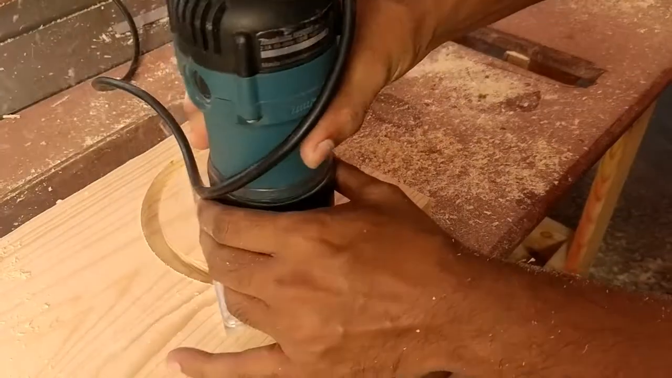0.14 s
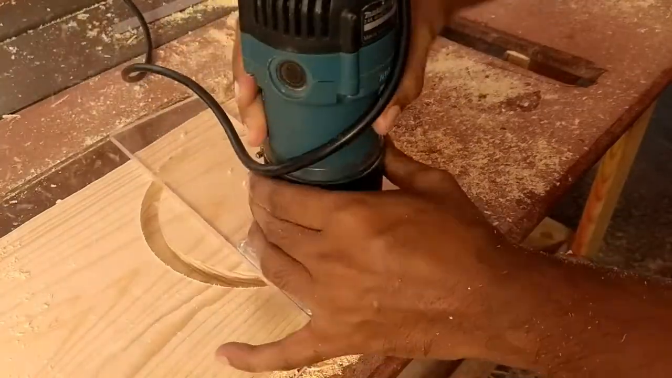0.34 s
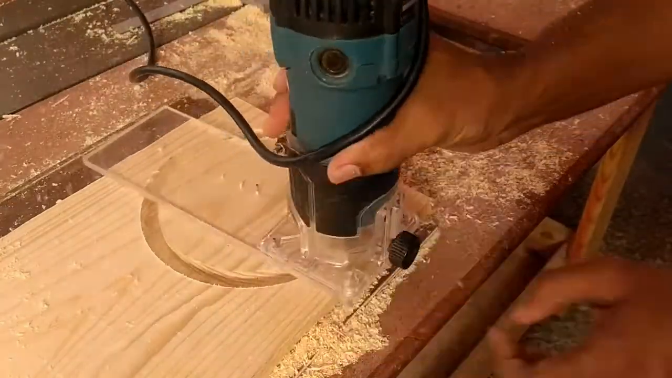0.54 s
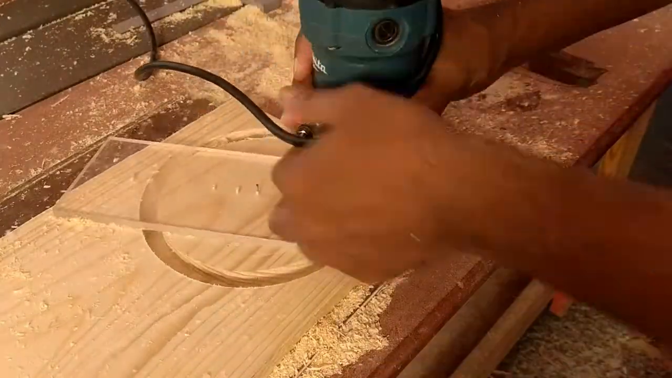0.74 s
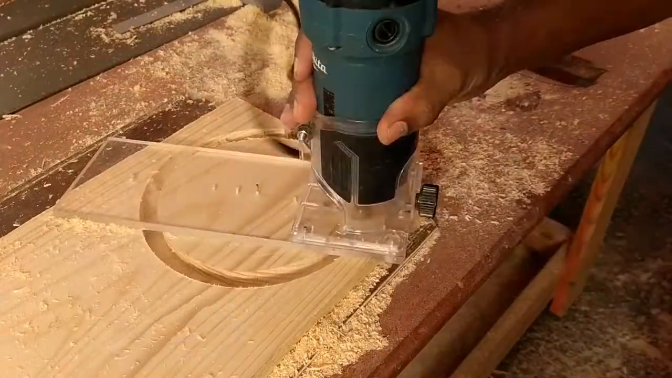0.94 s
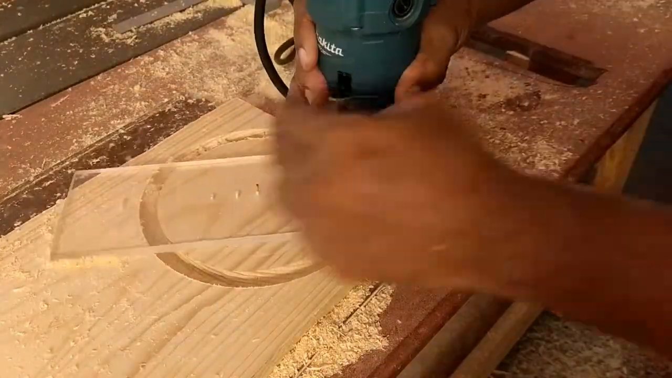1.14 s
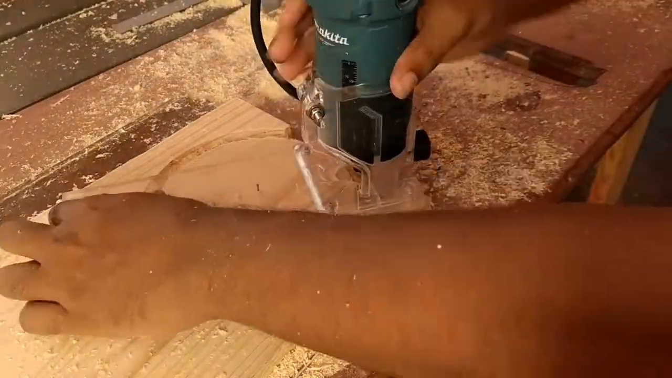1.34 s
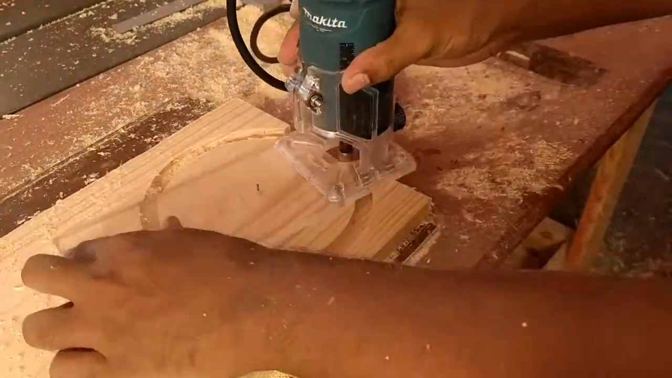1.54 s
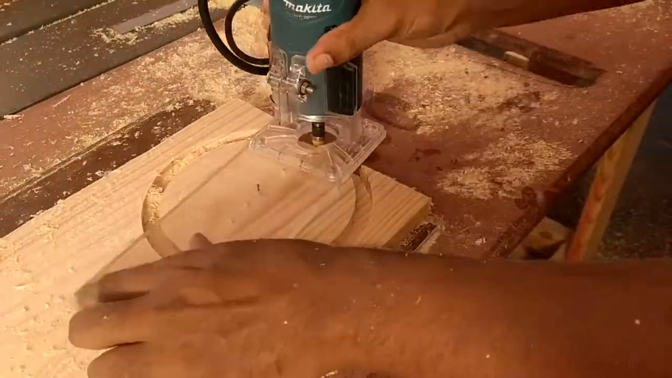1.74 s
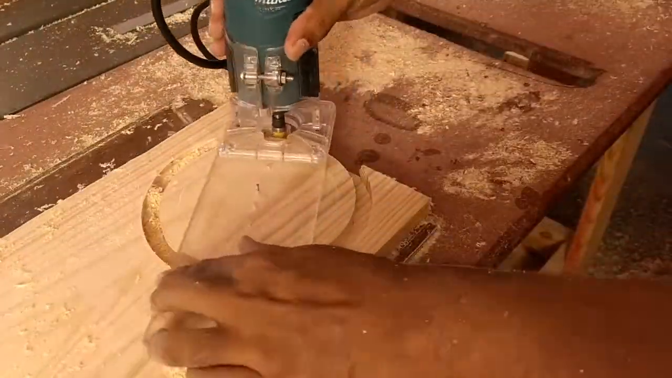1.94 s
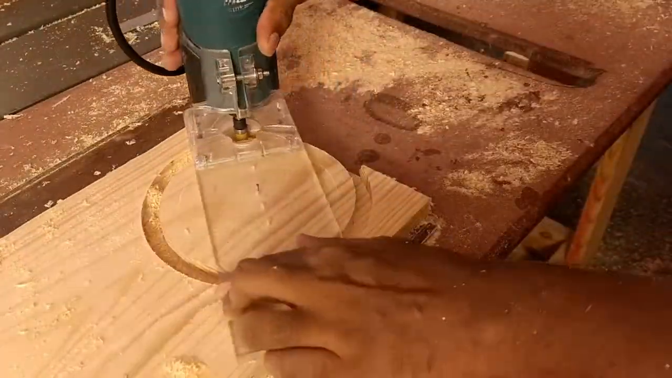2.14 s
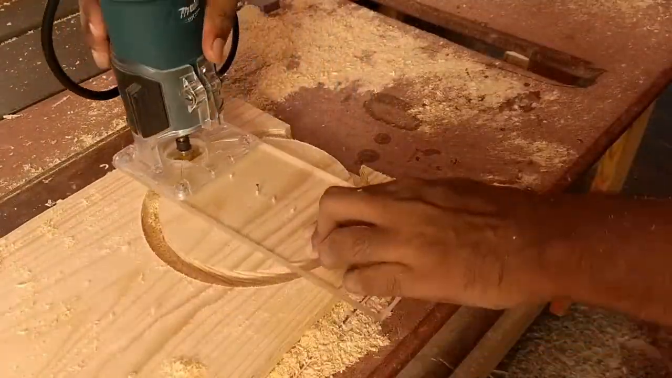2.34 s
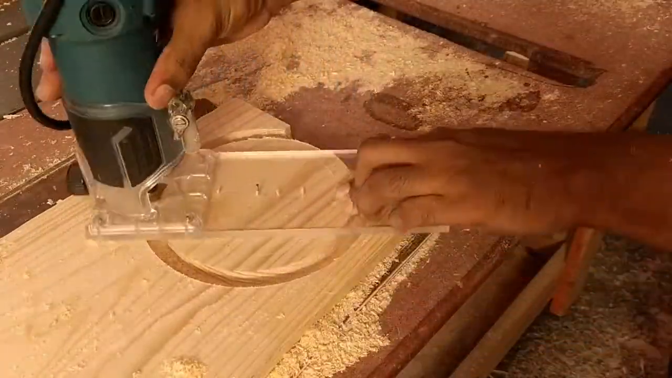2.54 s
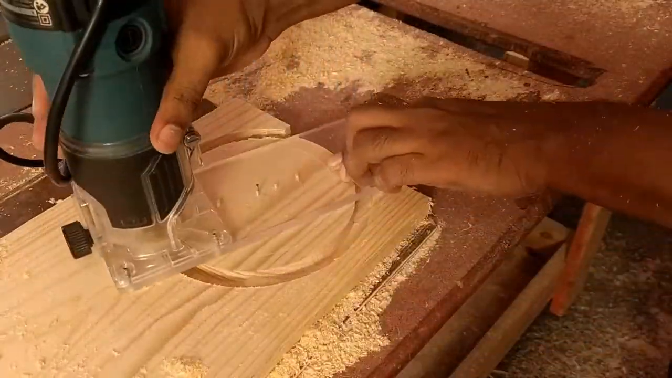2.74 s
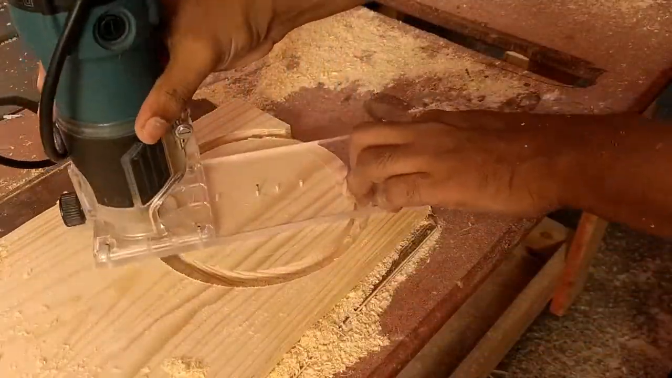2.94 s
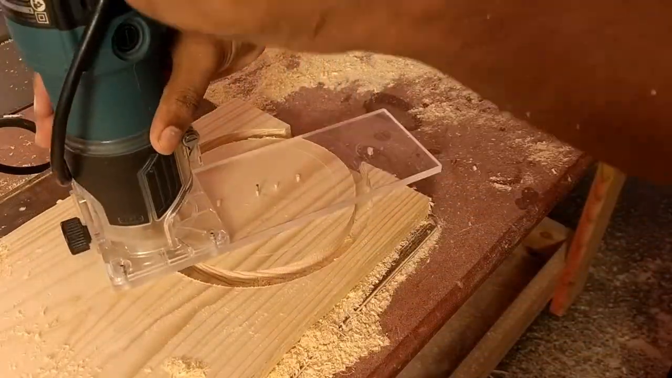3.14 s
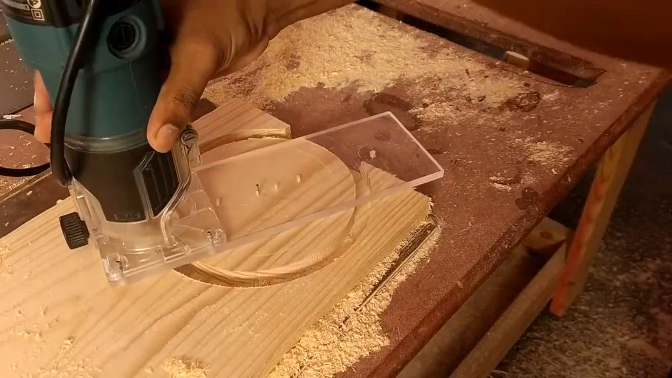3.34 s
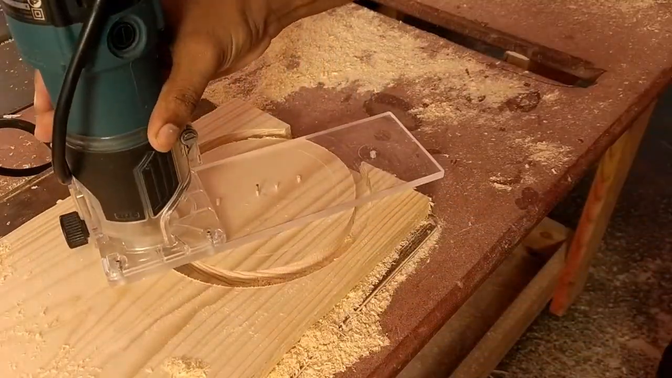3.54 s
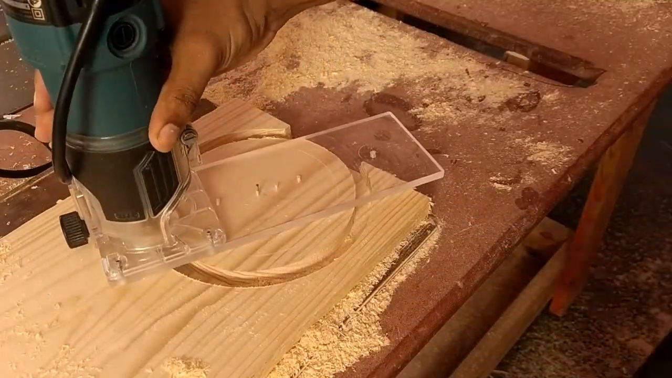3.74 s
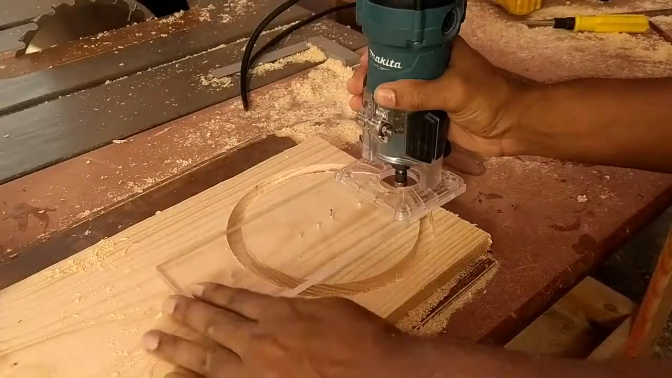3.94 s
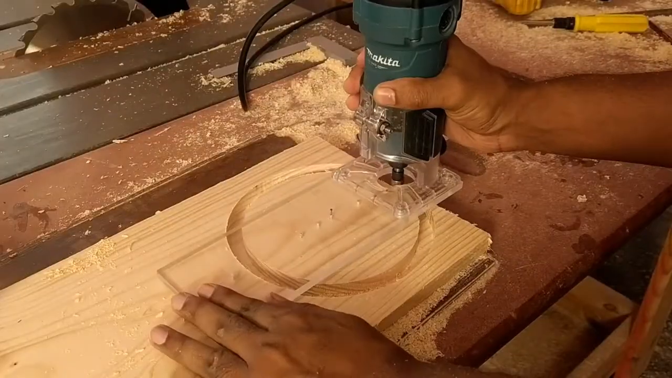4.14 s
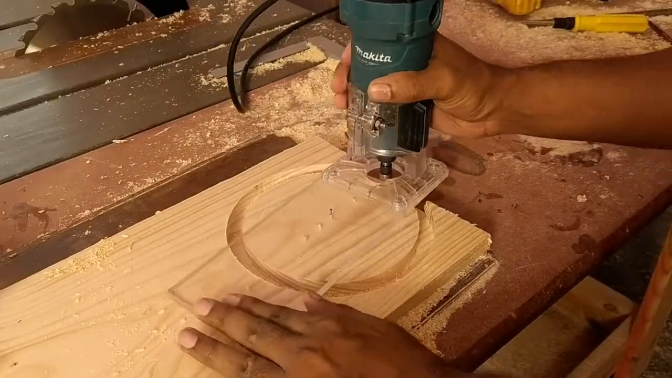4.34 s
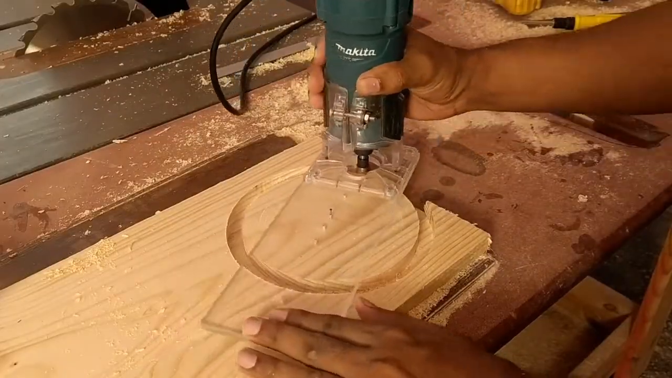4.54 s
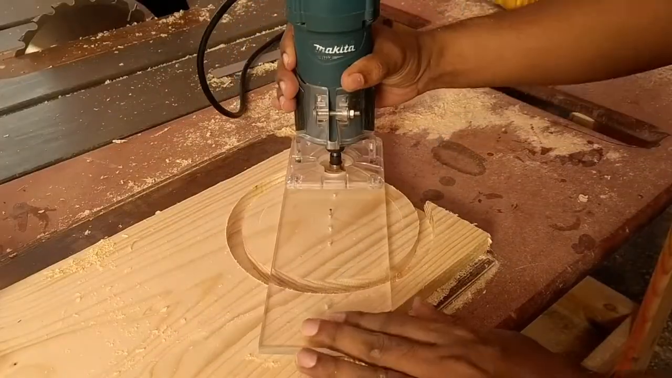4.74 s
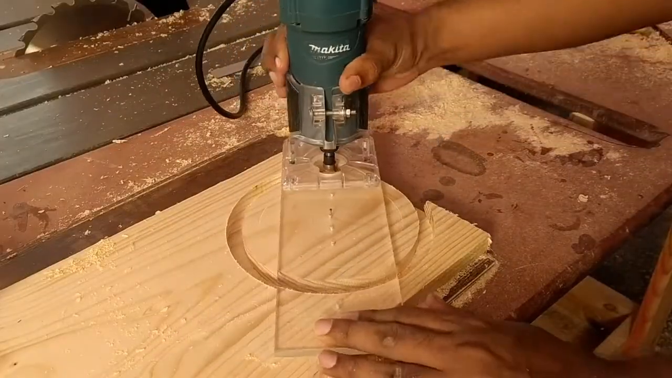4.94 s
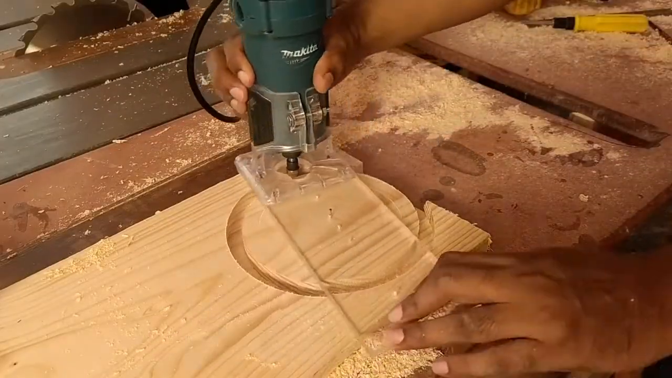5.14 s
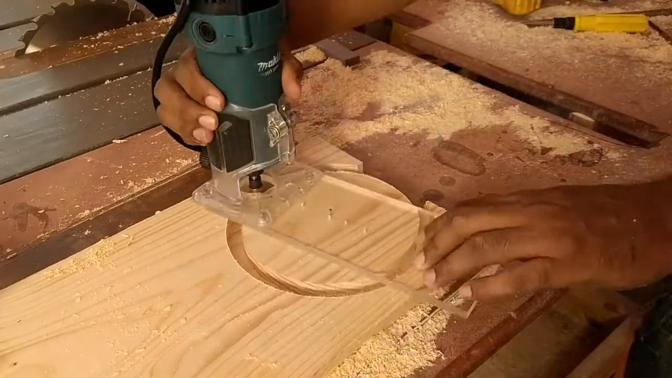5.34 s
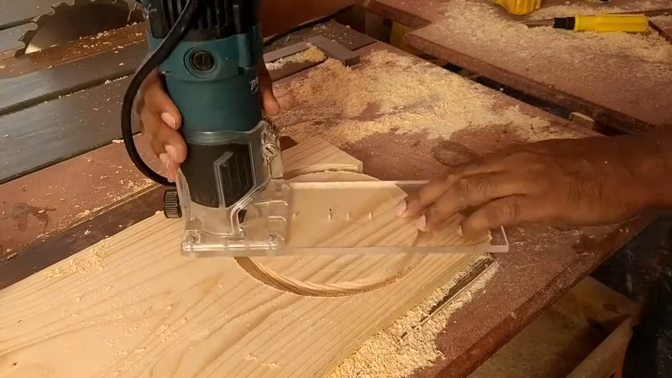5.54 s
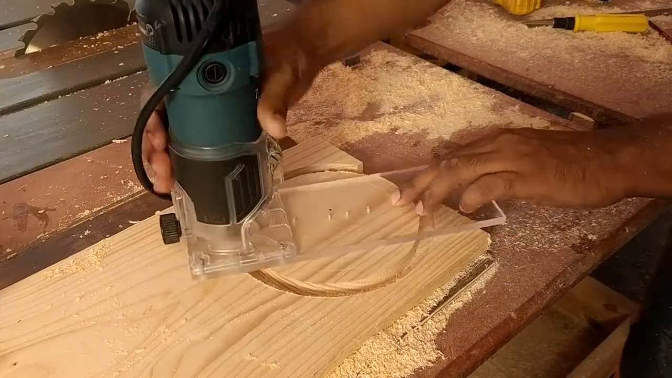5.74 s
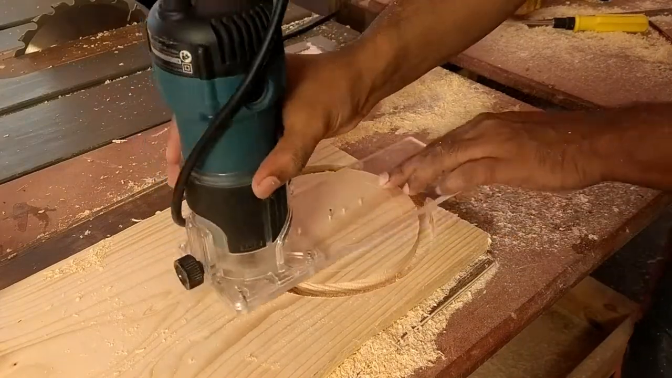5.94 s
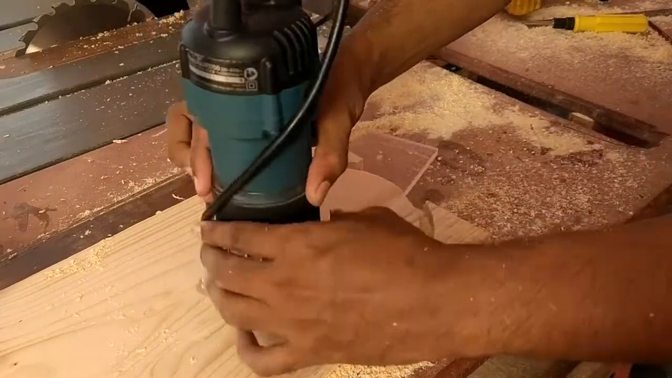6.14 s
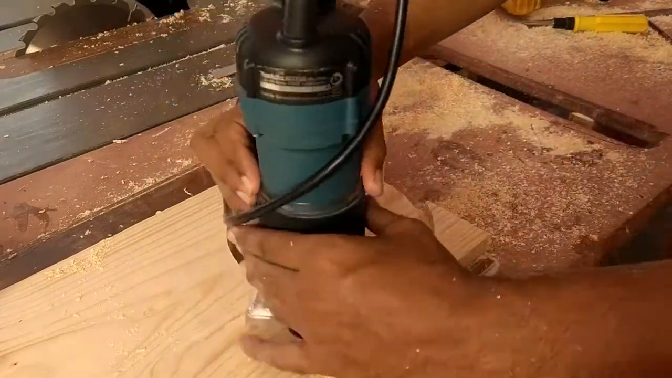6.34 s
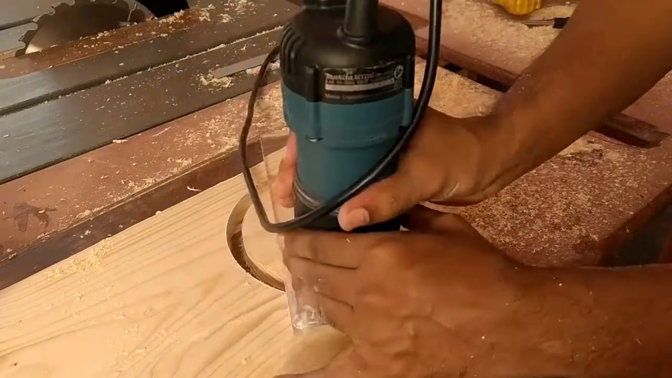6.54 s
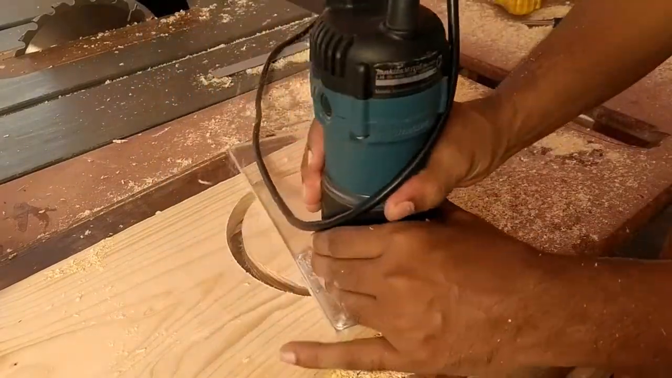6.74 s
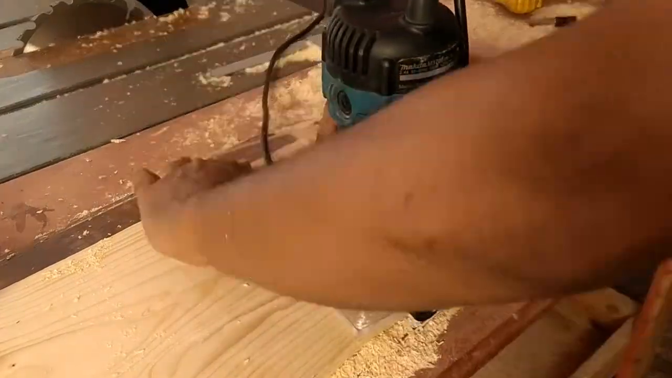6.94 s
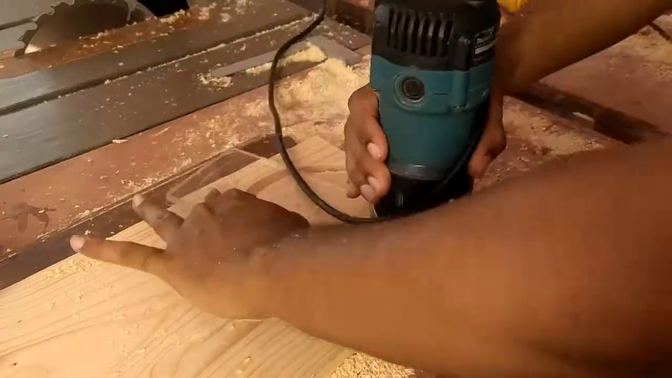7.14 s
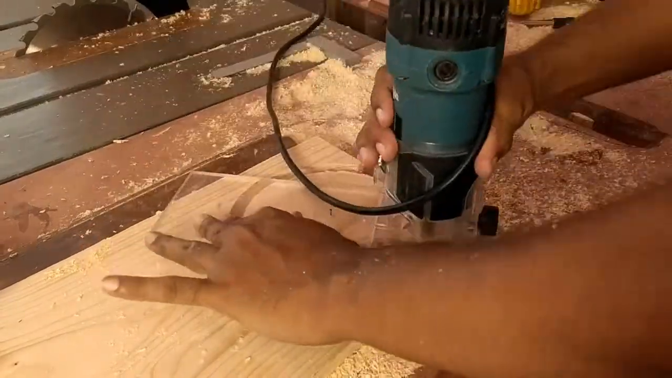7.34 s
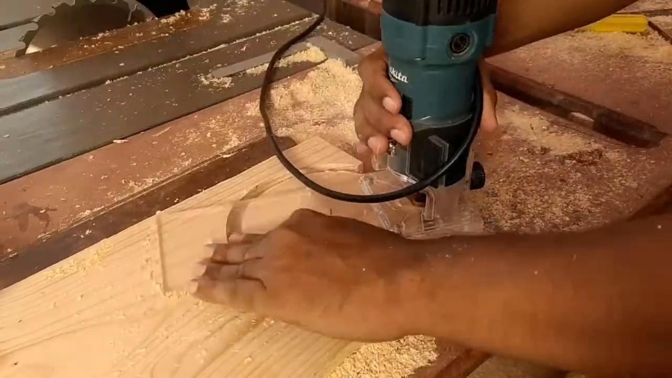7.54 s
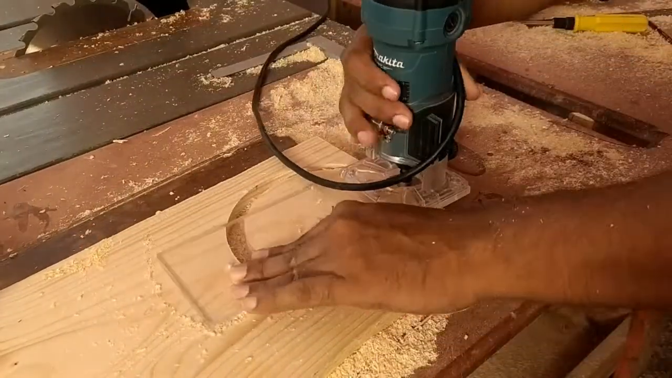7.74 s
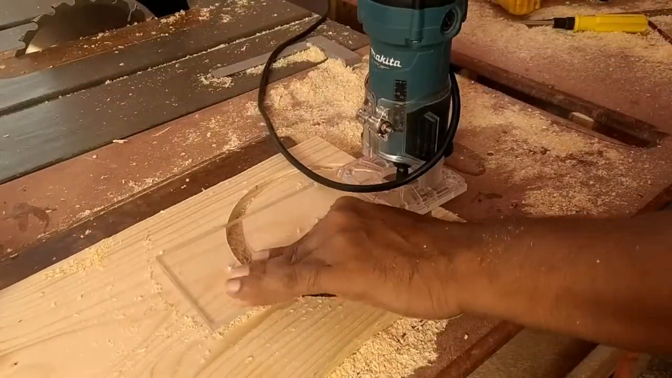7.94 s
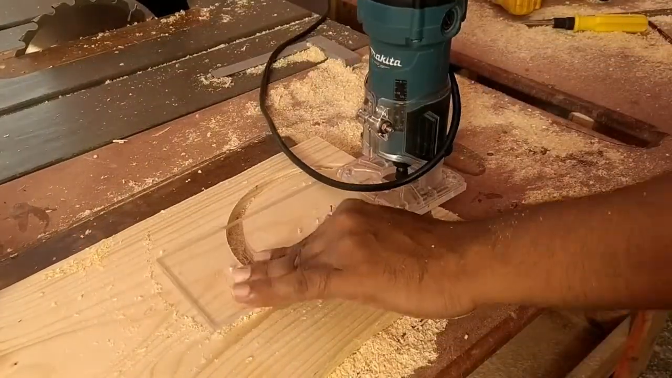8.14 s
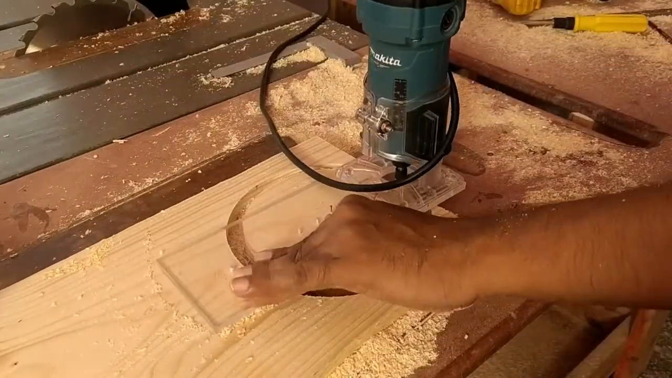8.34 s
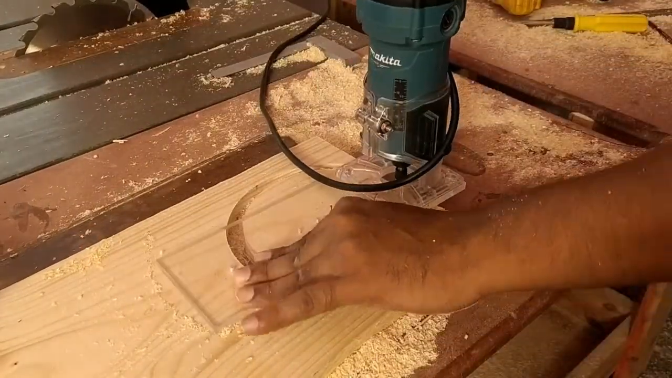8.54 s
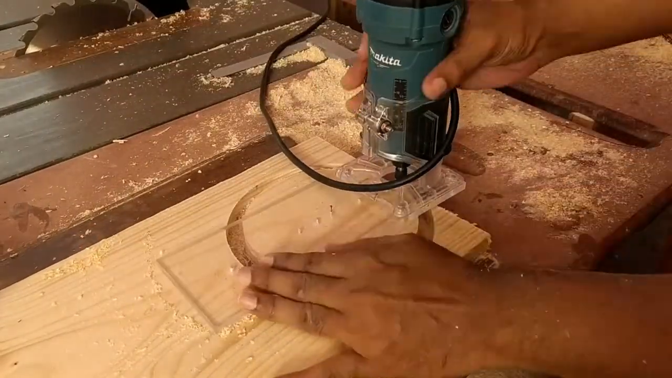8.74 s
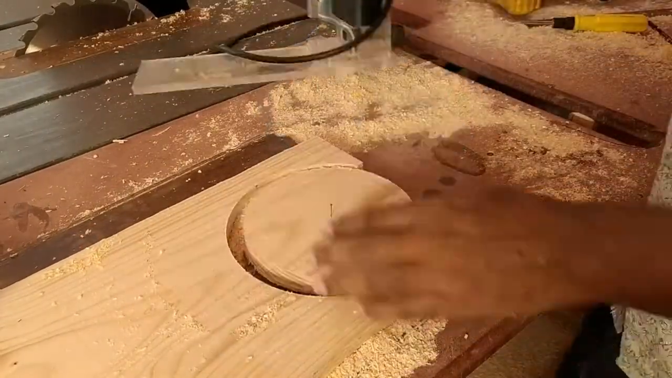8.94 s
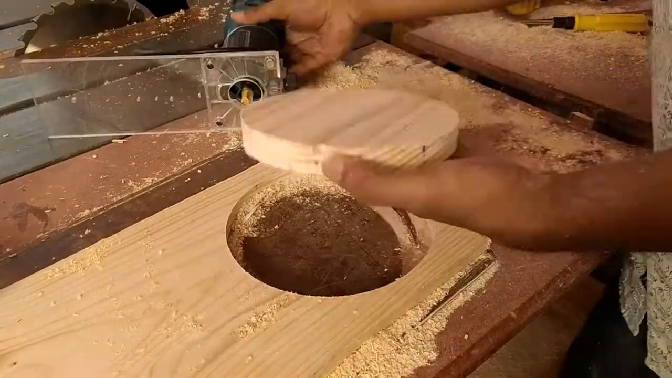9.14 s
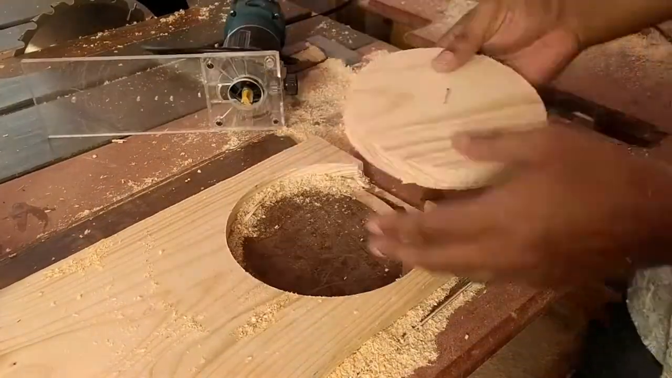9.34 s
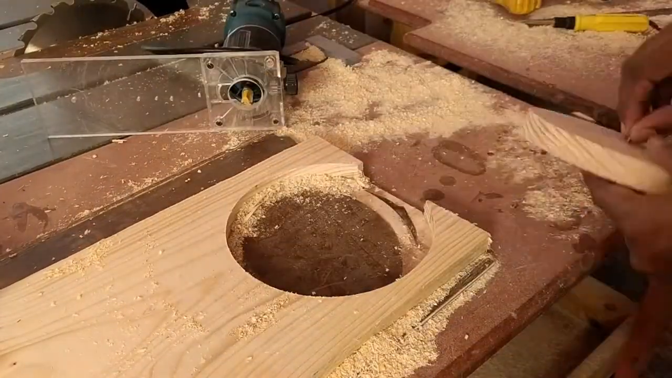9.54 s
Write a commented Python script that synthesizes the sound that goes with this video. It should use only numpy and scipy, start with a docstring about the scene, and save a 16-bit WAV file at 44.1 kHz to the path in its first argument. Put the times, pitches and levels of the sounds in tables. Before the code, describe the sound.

Close up, a handheld electric router cuts wood with a strained, wavering whine, gritty rasp, chatter and hiss. Around a third of the way in it coasts down briefly, breaks off abruptly and sweeps back up into more cutting. Near the end it winds down and stops, leaving faint workshop hum, low breeze buffets mainly on the right, soft swishes and a few wood knocks. Close stereo microphone.

```python
"""Router cutting a round groove

A handheld router cuts a board: shaft orders slow under load, the bit chatters, rasp and air hiss go with it.
It coasts down twice; after the first, a short gap, then the pitch sweeps up fast from about 200 Hz.
Under it lie a workshop wash of noise and the wavering hum of far machines. A breeze of low noise and short
puffs buffets mainly the right port; late on come treble swishes and wood knocks (board modes, thud, noise burst).
"""
import sys
import numpy as np
from scipy import signal
from scipy.fft import rfft, irfft, next_fast_len
from scipy.io import wavfile
from scipy.ndimage import uniform_filter1d, map_coordinates

SR = 44100
rng = np.random.default_rng(int(sys.argv[2]) if len(sys.argv) > 2 else 0)


def dump_mix(stems):
    """Bounce the given channels to the path in sys.argv[1] as a 16-bit WAV at rate SR."""
    frames = np.atleast_2d(stems).T  # one column per channel
    limited = np.clip(frames, -1, 1)  # hard clip at full scale
    pcm = np.round(limited * 32767).astype(np.int16)
    wavfile.write(sys.argv[1], SR, pcm)


N = 427329

SWITCH_OFF = (3.35, 7.92)  # s
GAP = (3.775, 3.813)  # s, short gap in the router's sound


def amp(db):
    """Gain of a level in dB."""
    return 10 ** (np.asarray(db) / 20)


def unit(x):
    """x at rms 1 along its last axis."""
    return x / np.sqrt(np.mean(x ** 2, axis=-1, keepdims=True) + 1e-20)


def along(points, hz):
    """(f/Hz, value) points read on a log frequency axis."""
    f, v = np.transpose(points)
    return np.interp(np.log(hz + 1), np.log(f + 1), v)


def curves(rows):
    """One value per sample for each column after t/s."""
    s, *cols = np.transpose(rows)
    return [np.interp(np.arange(N) / SR, s, c) for c in cols]


def wobble(rate):
    """Two smooth random curves, one per port, rate knots/s, repeating after 500 knots."""
    knots = rng.standard_normal((2, 500))
    knot_at = np.arange(N // 64 + 1) * 64 * rate / SR
    coarse = [map_coordinates(k, [knot_at], mode="wrap") for k in knots]
    return np.array([np.interp(np.arange(N) / 64, np.arange(len(c)), c) for c in coarse])


def noise(spectrum, patchy_db):
    """Coloured noise of rms 1, independent at the ports, with time-frequency patches of random gain."""
    hz, _, z = signal.stft(rng.standard_normal((2, N)), SR, nperseg=512)
    field = uniform_filter1d(rng.standard_normal(z.shape[1:]), size=6, axis=0)
    field = uniform_filter1d(field, size=10, axis=1)
    colour_db = np.where(hz < spectrum[0][0], -120, along(spectrum, hz))[:, None]
    z = z * amp(colour_db + patchy_db * field / field.std())
    return unit(signal.istft(z, SR, nperseg=512)[1][:, :N])


def tone(phase, scattered, rate):
    """Sine of rms about 1: a direct part plus a share of scattered paths fading separately at each port."""
    # quarter cycle between the ports
    start = phase + rng.uniform(0, 2 * np.pi) + np.array([[0], [np.pi / 2]])
    share = np.clip(scattered, 0, 1)
    direct = np.sqrt(2 - 2 * share) * np.sin(start + .35 * wobble(3))
    paths = wobble(rate) * np.sin(start) + wobble(rate) * np.cos(start)
    return direct + np.sqrt(share) * paths


def shaft():
    """Shaft speed in Hz: loaded under power, decaying exponentially when off, sweeping up fast after the gap."""
    # shaft under power, slowed by the cut: t/s, speed/Hz
    powered_speed = [(0.0, 396.5), (0.19, 347), (0.31, 371), (0.42, 400), (0.57, 357.7), (0.68, 355),
                     (0.82, 422.2), (0.93, 450.4), (1.04, 391.3), (1.11, 377), (1.39, 427.7), (1.45, 399),
                     (1.56, 409), (1.71, 468.4), (1.92, 484), (2.43, 479.3), (2.58, 464), (2.68, 465.7),
                     (3.03, 487), (3.34, 489.6), (4.08, 460), (4.56, 407.5), (4.73, 421), (4.87, 456.6),
                     (4.98, 416), (5.26, 394), (5.48, 391.3), (5.75, 413.7), (5.86, 391), (5.99, 391.8),
                     (6.17, 415.3), (6.34, 397), (6.53, 403.6), (6.72, 390.2), (6.89, 418.2), (7.09, 381),
                     (7.24, 390), (7.36, 372.7), (7.47, 383), (7.78, 461), (7.9, 483)]
    coast_s, sweep_s, sweep_from_hz = .46, .075, 200.4  # time constants; speed at the start of the gap's sweep
    t = np.arange(N) / SR
    speed_hz, = curves(powered_speed)
    since_s = np.maximum(t - GAP[0], 0)
    lag_hz = (speed_hz - sweep_from_hz) * np.exp(-since_s / sweep_s)
    speed_hz = speed_hz - (t > GAP[0]) * lag_hz
    for off, on in zip(SWITCH_OFF, (GAP[0], N)):
        coast_hz = np.interp(off, t, speed_hz) * np.exp(-np.maximum(t - off, 0) / coast_s)
        speed_hz = np.where((t > off) & (t <= on), coast_hz, speed_hz)
    return speed_hz


def router():
    """Shaft orders, chatter tones chopped by the flutes, rasp and air pulsed once a turn, mid-treble air hiss."""
    # tool led round the circle: t/s, unbalance/dB, two-flute beat/dB, housing buzz/dB, whine/dB, snarl/dB,
    # depth of cut/dB
    groove = [(0, -36.5, -17, -21, -19.5, 1, 1), (.25, -31, -25, -19.5, -20, 2, 2),
              (.6, -22.5, -22, -28, -22, 9, 1), (.73, -28, -27.5, -27, -21.5, 7, -5.5),
              (.78, -32, -38, -22, -11, 2, -5.5), (.95, -33.5, -25, -18.5, -16.5, 2.5, 4),
              (1.0, -31, -27, -37, -24.5, 12, 3), (1.15, -41, -18.5, -23, -24.5, 15, -1),
              (1.3, -32, -21, -19, -23, 15.5, 1), (1.38, -32.5, -34, -25, -14, 3.5, -6),
              (1.46, -31, -33, -28, -14, 1.5, -4.5), (1.5, -19.5, -13, -18, -16.5, 6.5, 1),
              (1.67, -19, -26, -13, -19, 6, 2), (1.905, -22.5, -33, -24.5, -17.5, 3, -20),
              (1.94, -34, -30, -30, -12.5, -0.5, -18), (2.3, -33, -26, -10.5, -16.5, 6, -2),
              (2.65, -25, -31.5, -26, -10.5, -0.5, -21), (3.3, -31, -23, -22, -14, -1.5, -23),
              (4.1, -22.5, -27, -22, -14.5, 0.5, -2), (4.87, -23, -15.5, -21.5, -16.5, -1, 3),
              (5.1, -31.5, -23, -26, -12.5, -4.5, -4.5), (5.6, -45, -28, -26.5, -13, -1, -10.5),
              (6.1, -28.5, -22, -23, -16.5, 4.5, 0), (6.7, -31.5, -19.5, -20, -12.5, -3, -1.5),
              (6.85, -27.5, -25.5, -18, -15.5, 4.5, 3), (7.06, -31.5, -24.5, -22.5, -18, 12.5, -7),
              (7.44, -32.5, -29.5, -31, -15, 1.5, -7.5), (7.86, -18, -23, -12.5, -19.5, 4, 4)]
    # side tones of the chatter: shaft turns added, level/dB
    side_tones = [(0, 0), (1, -5), (2, -2), (3, -2), (4, -13)]
    # upper shaft orders: f/Hz, level/dB
    whine_colour = [(6000, -2.5), (16000, 3.5)]
    # rasp spectrum: f/Hz, density/(dB per Hz)
    rasp_colour = [(120, -33), (450, -7), (620, -13.5), (900, -4), (1800, -2), (3000, -9), (6000, -29)]
    # cooling air spectrum: f/Hz, density/(dB per Hz)
    air_colour = [(3000, -25), (6000, -4), (8000, 0), (11500, -0.5)]
    # mid-treble air hiss spectrum: f/Hz, density/(dB per Hz)
    mid_air_colour = [(1500, -9), (3000, 0.5), (5000, -1), (7500, -7), (12000, -36)]
    full_hz = 484.8  # free-running speed
    silent_s = 8.58
    patchy_db = 1.5
    unbalance_db_per_hz = .1
    ring_hz, ring_wide_hz, ring_db = 454, 59.7, 12  # housing resonance passed while coasting
    last_unbalance_db, mid_air_last_db = 12, 3  # drops in the last coast
    coast_power = 1.98  # orders fade with this power of speed while coasting
    coast_beat_db, coast_rasp_db, coast_rasp_power = -3, 6, 1.6
    rasp_base_db, rasp_load_db = -28, 3  # running free; change at full load
    chatter_base_db, chatter_under_hz, chatter_db_per_hz = -24, 395.7, .5
    overtone_db = -4.5  # chatter octave
    air_base_db, air_load_db, fan_power = -15, -1, 0.52  # at full speed; change at full load; growth with speed
    fan_coast_db, fan_coast_power = (2, 3), (1.25, .6)  # step and extra speed power, per coast
    air_yields = .45  # dB/dB, smooth running turns hiss into whine
    mid_air_base_db, mid_air_yield = -24.5, 1.05  # yield in dB/dB: less hiss when whine and snarl are strong
    snarl_under_hz, flutter_hz = 5600, 45  # snarl lifts orders below; rate at which upper orders break up
    last_fade_s, last_fade_db = 0.2, -11

    speed_hz = shaft()
    unbalance_db, flute_db, buzz_db, whine_db, snarl_db, depth_db = curves(groove)
    t = np.arange(N) / SR
    sounding = (t < silent_s) & ((t < GAP[0]) | (t > GAP[1]))
    load = np.clip((full_hz - speed_hz) / 90, 0, 1)
    # orders and whine return to full level about 0.09 s after the gap
    coasting = ((t > SWITCH_OFF[0]) & (t < GAP[1] + .09)) | (t > SWITCH_OFF[1])
    power = uniform_filter1d(1. - coasting, size=2500)
    unpowered = 1 - power
    slow_db = 20 * np.log10(speed_hz / full_hz)
    cut = load * power
    second = (t > np.mean(SWITCH_OFF)) * 1

    ring = ring_db / (1 + ((speed_hz - ring_hz) / ring_wide_hz) ** 2)
    last_drop_db = last_unbalance_db * second * load
    unbalance_db = unbalance_db + unbalance_db_per_hz * power * (speed_hz - chatter_under_hz)
    unbalance_db = unbalance_db + unpowered * (5 - last_drop_db + ring)
    flute_db = flute_db + coast_beat_db * unpowered
    buzz_db = buzz_db + (coast_beat_db - .5 * last_drop_db) * unpowered
    rasp_db = rasp_base_db + (rasp_load_db + depth_db) * cut
    rasp_db = rasp_db + (coast_rasp_db + coast_rasp_power * slow_db) * unpowered
    # chatter weakens above the threshold speed
    chatter_db = chatter_base_db + depth_db - chatter_db_per_hz * np.maximum(speed_hz - chatter_under_hz, 0)
    fan_db = np.take(fan_coast_db, second) + np.take(fan_coast_power, second) * slow_db
    air_db = air_base_db + air_load_db * cut + fan_power * slow_db + fan_db * unpowered
    air_db = air_db - air_yields * power * (whine_db - whine_db.mean())
    clean_db = whine_db + .5 * snarl_db
    mid_air_db = mid_air_base_db + air_db - air_base_db
    mid_air_db = mid_air_db - mid_air_yield * power * (clean_db - clean_db.mean())
    mid_air_db = mid_air_db - mid_air_last_db * second * unpowered

    rough = np.maximum(load, unpowered)
    low = amp(coast_power * slow_db * unpowered)
    # flutes bite unevenly: speed jitter
    jitter = (.0015 + .003 * rough) * wobble(30)[0] + .0055 * cut * wobble(120)[0]
    turn = 2 * np.pi * np.cumsum(speed_hz * (1 + jitter)) / SR
    first_scatter = 0.1 + 0.46 * cut + (0.26 + second) * unpowered
    out = low * amp(unbalance_db) * tone(turn, first_scatter, rate=30)
    out += low * amp(flute_db) * tone(2 * turn, 0.14 + 0.54 * rough, rate=20)
    buzz = sum(0.55 * (3 / k) * tone(k * turn, 0.46 + 0.76 * rough, rate=26) for k in (3, 4))
    out += low * amp(buzz_db) * buzz

    # the bit bends at its own pitch; the turning flutes chop it into side tones
    bend_hz = 1020 + .8 * (np.clip(speed_hz, 340, 430) - 395) + 12 * wobble(8)[0]
    bend = 2 * np.pi * np.cumsum(bend_hz) / SR
    chatter = sum(amp(db) * tone(bend + k * turn, 0.7, rate=28) for k, db in side_tones)
    out += power * amp(chatter_db) * chatter
    out += power * amp(chatter_db + overtone_db) * tone(2 * bend, 0.5, rate=16)

    # uneven commutator and fan blades feed the higher orders; chatter phase-modulates them
    shake = np.clip(amp(chatter_db + 21.5), 0, 1.6) * np.sin(bend)
    upper = np.zeros((2, N))
    for k in range(5, 38):
        order_hz = k * speed_hz
        order_db = along(whine_colour, order_hz) + snarl_db / (1 + (order_hz / snarl_under_hz) ** 6)
        upper += amp(order_db) * tone(k * turn + shake, 0.36 + 0.99 * rough, rate=flutter_hz)
    out += power * amp(whine_db - 14.0) * upper  # silent without current

    out += amp(rasp_db) * (1 + 0.2 * np.cos(turn)) * noise(rasp_colour, patchy_db)
    out += amp(air_db + wobble(12)[0]) * (1 + 0.13 * np.cos(turn)) * noise(air_colour, patchy_db)
    out += amp(mid_air_db) * noise(mid_air_colour, patchy_db)
    fade_db = last_fade_db * np.clip(1 - (silent_s - t) / last_fade_s, 0, 1)
    waver_db = 1.23 * wobble(18)[0]  # the whole router wavers in level, alike at both ports
    return out * amp(fade_db + waver_db) * uniform_filter1d(sounding * 1., size=250)


def shop():
    """Workshop noise wash and far machines' hum: fixed-pitch tones with fully scattered, wavering paths."""
    # far machines: f/Hz, level/dB
    machines = [(284, -50), (577, -49), (673, -54)]
    # wash spectrum: f/Hz, density/(dB per Hz)
    wash_colour = [(60, -12), (300, -8), (600, -6.5), (5000, -19.5), (9000, -18.5), (16000, -20)]
    t = np.arange(N) / SR
    hum = sum(amp(db) * tone(2 * np.pi * hz * t, 1.0, rate=5.5) for hz, db in machines)
    return hum + amp(-38.5) * noise(wash_colour, patchy_db=1.9)


def breeze():
    """Lumpy low noise plus Gaussian puffs of a cycle or two, far stronger on the exposed right port."""
    # right-port buffeting: t/s, level/dB
    buffet_level = [(0, -65), (1.1, -36.5), (1.9, -50), (3.5, -51), (3.85, -30), (4.5, -38), (5.7, -41),
                    (7.3, -39), (7.75, -33), (8.3, -32), (8.66, -35), (8.85, -28.5), (9.05, -38.5),
                    (9.4, -37)]
    # right-port puffs: t/s, peak/dB
    gusts = [(3.356, -17.5), (3.824, -12), (3.876, -15), (3.925, -22), (8.125, -16), (8.18, -16),
             (8.46, -15.5), (8.569, -10), (8.77, -13), (8.857, -18), (8.999, -10), (9.026, -12),
             (9.678, -18)]
    # buffet spectrum: f/Hz, density/(dB per Hz)
    buffet_colour = [(20, -7), (60, 3.5), (130, -0.5), (260, -3), (500, -13), (1200, -100)]
    flurry_from_s, flurry_to_s, flurry_db = 8.74, 9.06, -17  # small puffs at random times
    level_db, = curves(buffet_level)
    lumps_db = np.minimum(1.6 * wobble(6) + 5 * wobble(40), 6)
    out = amp(level_db + lumps_db) * noise(buffet_colour, patchy_db=3.5)
    t = np.arange(-600, 600) / SR
    flurry = [(s, flurry_db) for s in rng.uniform(flurry_from_s, flurry_to_s, size=12)]
    for s, db in list(gusts) + flurry:
        puff_hz = rng.uniform(143, 308.0)
        wander = uniform_filter1d(np.cumsum(rng.normal(0, 0.084, len(t))), size=40)
        puff = np.exp(-(t / 0.0029) ** 2) * np.cos(2 * np.pi * puff_hz * t + wander)
        part = out[:, round(s * SR) - len(t) // 2:][:, :len(t)]
        part += (amp(db) * puff * [[.5], [1]])[:, :part.shape[1]]
    return out * amp([[-11.5], [0]])


def swishes():
    """Short soft puffs of treble hiss: noise under Gaussian envelopes."""
    # swishes: t/s, level/dB
    swish_times = [(8.69, -39), (9.05, -34.5)]
    # hiss spectrum: f/Hz, density/(dB per Hz)
    swish_colour = [(4500, -9), (8000, 5), (12000, -6)]
    swish_s = 0.014
    t = np.arange(N) / SR
    envelope = sum(amp(db) * np.exp(-((t - s) / swish_s) ** 2) for s, db in swish_times)
    return envelope * noise(swish_colour, patchy_db=-5)


def knocks():
    """Wood meets wood: decaying board modes, a low thud, and a noise crack with a short bench and wall answer."""
    # knocks: t/s, relative level/dB, relative thud level/dB
    hits = [(8.821, -25.5, -7), (8.991, -34, 14), (9.593, -11.5, -14)]
    # board modes: f/Hz, relative level/dB, t60/s
    board_modes = [(743, 4.5, 0.057), (1120, 6, 0.029), (1510, 15, 0.026), (2500, -11, .06)]
    out, t = np.zeros((2, N + SR)), np.arange(SR // 5) / SR
    for s, db, thud_db in hits:
        ring = np.zeros((2, len(t)))
        for hz, level_db, t60_s in board_modes:
            decay = amp(level_db + rng.normal(0, 1.3, (2, 1)) - 60 * t / t60_s)
            ring += decay * np.sin(2 * np.pi * hz * t + rng.uniform(0, 2 * np.pi, (2, 1)))
        thud = amp(thud_db + 6.0 - 60 * t / 0.084) * np.sin(2 * np.pi * 275 * t)
        scatter = signal.lfilter(*signal.butter(6, 2500 / SR * 2), rng.standard_normal((2, len(t))))
        tail = 3.5 * scatter * amp(-60 * t / 0.074)
        attack = (1 - np.exp(-t / 0.0045)) ** 3
        out[:, round(s * SR) - 200:][:, :len(t)] += amp(db + 1) * attack * (ring + thud + tail)
    return out[:, :N]


def scene():
    """All sources as the two microphone ports meet them."""
    return router() + shop() + breeze() + swishes() + knocks()


def record(dry):
    """Soft-clips peaks, colours the ports' treble unlike; above the shelf left drops and right keeps nothing."""
    # treble of the left port over the right, below the shelf: f/Hz, difference/dB
    port_treble = [(5500, 0), (8800, -5), (10300, 0), (12100, 8)]
    shelf_hz, top_hz = 12150, 15770
    clipped = dry / (1 + np.abs(dry / .99) ** 8) ** (1 / 8)
    m = next_fast_len(N + 8192)
    hz = np.fft.rfftfreq(m, 1 / SR)
    shelf = amp(along([(12700, -12.0), (14300, -10.5), (15600, -18.0)], hz))
    below = amp(along(port_treble, hz) * [[.5], [-.5]])
    gain = np.where(hz < shelf_hz, below, shelf * [[1], [0]]) * (hz < top_hz)
    return irfft(rfft(clipped, m) * gain, m)[:, :N]


dry = scene()
out = record(dry)
dump_mix(out)
```